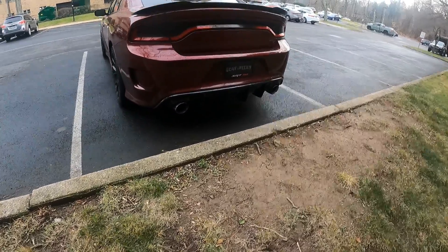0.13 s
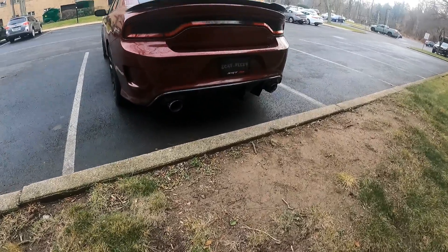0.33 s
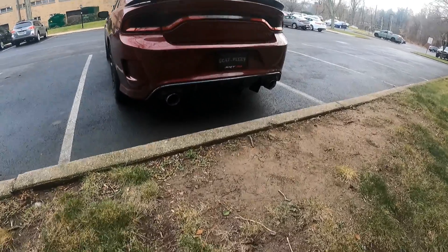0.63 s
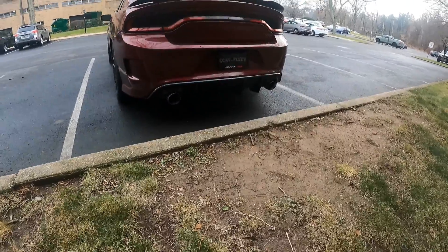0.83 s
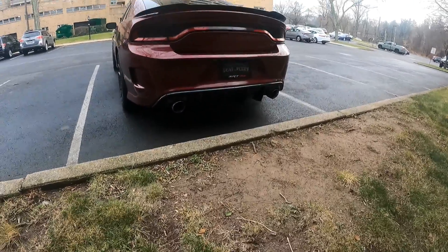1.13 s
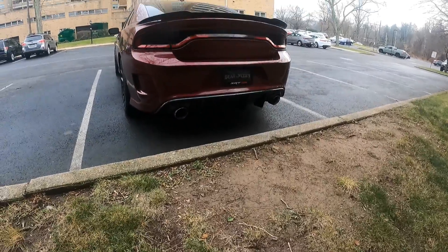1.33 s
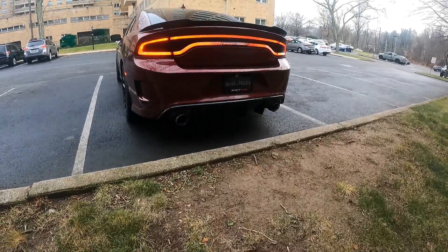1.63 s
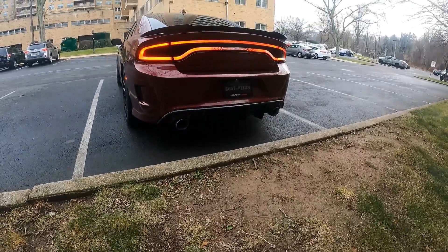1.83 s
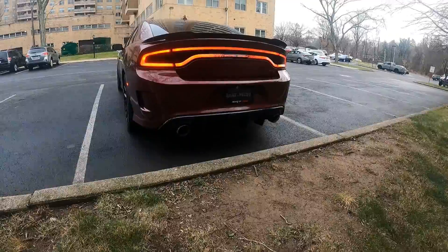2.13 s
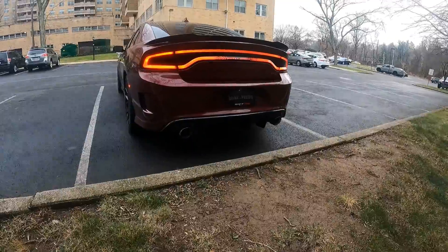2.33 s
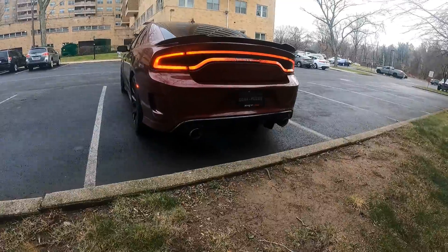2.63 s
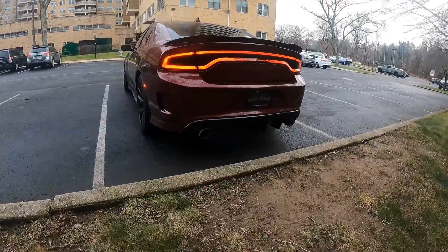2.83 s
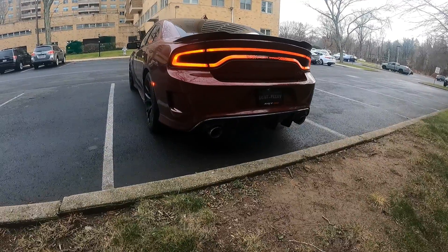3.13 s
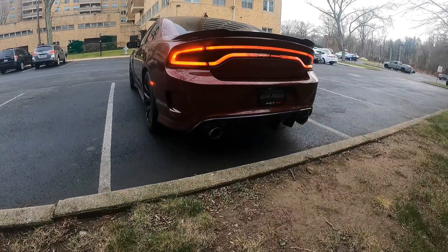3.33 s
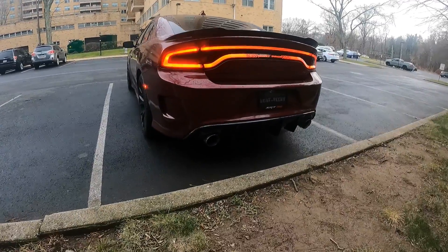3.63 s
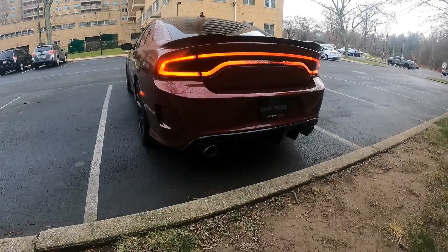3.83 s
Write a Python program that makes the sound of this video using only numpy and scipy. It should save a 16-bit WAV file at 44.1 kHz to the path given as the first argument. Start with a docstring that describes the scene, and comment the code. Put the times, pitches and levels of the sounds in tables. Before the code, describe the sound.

A car engine starts outdoors, heard from close behind. Faint wind, traffic wash and a small tick open. At 0.8 s the starter clanks and grinds, held until 1.2 s, then in short bursts with a sagging whine, soft low puffs and a faint key jingle. At 1.57 s it catches with loud crackling pops, flares near 1.8 s, then sinks into a deep, raspy, throbbing idle until 4 s, with short dry echoes.

```python
"""Faint open air and small ticks come first; then a starter grinds in quick bursts and one long hold, an
eight-cylinder car engine catches with pops, flares and sinks to a throbbing idle, heard from
behind in an open parking lot. Pulse trains excite pipe resonances for the exhaust; noise bursts make
the pops, rattling teeth and a sagging whine the starter, shaped noise the keys, wind and traffic."""
import sys
import numpy as np
from scipy import signal
from scipy.fft import rfft, irfft, next_fast_len
from scipy.io import wavfile
from scipy.ndimage import uniform_filter1d

SR = 44100
rng = np.random.default_rng(int(sys.argv[2]) if len(sys.argv) > 2 else 0)


def output_pcm(signal):
    """Save a mono or channel-first signal as 16-bit PCM at the path in sys.argv[1].

    Samples are clipped to [-1, 1] before scaling.
    """
    pcm = np.clip(np.atleast_2d(signal).T, -1, 1) * 32767
    wavfile.write(sys.argv[1], SR, np.round(pcm).astype(np.int16))


N = 176400  # samples: 4 s


def gain_of(db):
    """Decibel law: an amplitude ratio is ten to the power dB / 20."""
    return 10 ** (np.asarray(db) / 20)


def evened(x):
    """Normalisation: scales a signal to unit rms."""
    return x / np.sqrt(np.mean(x ** 2) + 1e-20)


def curve(table, axis=1):
    """Linear interpolation: one column of a time table at every sample."""
    rows = np.array(table)
    return np.interp(np.arange(N) / SR, rows[:, 0], rows[:, axis])


def read(points, hz):
    """Log-frequency interpolation of a spectrum table."""
    f, value = np.transpose(points)
    return np.interp(np.log(hz + 1), np.log(f + 1), value)


def colour(x, points):
    """Spectral shaping: multiplies the spectrum by a table of gains in dB."""
    gain = gain_of(read(points, np.fft.rfftfreq(len(x), 1 / SR)))
    return irfft(rfft(x) * gain, len(x))


def ring(x, modes):
    """Modal superposition: a sum of damped resonators (pitch_hz, width_hz, strength)."""
    size = next_fast_len(len(x) + SR // 2)
    f = np.fft.rfftfreq(size, 1 / SR)
    response = sum(a * 1j * f * w / (hz ** 2 - f ** 2 + 1j * f * w) for hz, w, a in modes)
    return irfft(rfft(x, size) * response, size)[:len(x)]


def signed(modes):
    """Alternating modal polarity: turns levels in dB into strengths of alternating sign."""
    return [(hz, w, (-1) ** k * gain_of(db)) for k, (hz, w, db) in enumerate(modes)]


def filtered(x, order, hz, kind="low"):
    """Butterworth filtering: passes one side of a corner frequency."""
    return signal.sosfilt(signal.butter(order, hz, kind, fs=SR, output="sos"), x)


def add(mix, s, sound):
    """Superposition: mixes a sound in at s seconds."""
    part = mix[round(s * SR):][:len(sound)]
    part += sound[:len(part)]


# Firing rate of the whole engine: time_s, firings_per_s
FIRING_RATE = [(1.56, 30.2), (1.6, 76.6), (1.64, 86.3), (1.7, 113.5), (1.76, 125.2), (1.82, 136.5),
               (1.9, 127.7), (2.0, 129.2), (2.1, 122.4), (2.3, 111.6), (2.5, 106.9), (2.7, 102.2),
               (2.9, 96.8), (3.1, 94.7), (3.4, 92.8), (4.0, 91.7)]
# Exhaust balance: time_s, boom_db, rasp_db, brightness_db_per_octave
EXHAUST = [(1.56, 4, -16, 3), (1.64, -3.5, -26.5, 0), (1.66, -7, -37.5, -6.5), (1.69, -1, -29, 1),
           (1.77, -4.5, -29, -3.5), (1.83, -13.5, -34, 0.5), (1.86, -7, -28, -2), (2.05, -6, -31.5, -3.5),
           (2.2, -5, -37.5, -5.5), (2.65, -5.5, -39, -3.5), (3.0, -2.5, -32, -2), (3.4, -1.5, -29, -3.5),
           (4.0, -1.5, -28, -3.5)]
# Cylinders in firing order: boom_strength (about the mean), rasp_db (before each resonance's share)
CYLINDERS = [(0.46, -5), (-0.18, -5), (-0.35, -0.5), (-0.45, -1.5), (0.2, 1), (0.43, 4), (-0.031, 1),
             (0.38, 1)]


def engine():
    """Periodic excitation: integrated firing rate times the pulses that drive boom and rasp."""
    t = np.arange(N) / SR
    firings = np.cumsum(curve(FIRING_RATE) * (t >= FIRING_RATE[0][0])) / SR
    at = np.flatnonzero(np.diff(np.floor(firings))) + 1
    order = np.arange(1, len(at) + 1) % len(CYLINDERS)
    uneven, rasp_db = np.array(CYLINDERS)[order].T
    return boom(firings, at, uneven), rasp(firings, at, rasp_db)


# Exhaust pipe modes: pitch_hz, width_hz, signed_strength
PIPE_MODES = [(83.7, 51, -1.9), (111.2, 31.6, -1.3), (161.7, 23.15, 7.5), (174.8, 17.7, -3.5),
              (254, 12.4, 1)]
# Branch pipe modes, rung by uneven firing: pitch_hz, width_hz, strength
BRANCH_MODES = [(124.6, 22.3, 2.71), (166.4, 16.3, 1.83), (193, 24.7, 1.17)]
BOOM_DB, BOOM_LEAD_S, BOOM_TOP_HZ = 30.5, 0.00444, 520
LOOSE, SETTLE_S = 0.28, 0.87  # relative scatter of the first firings and how fast it settles
# Smooth surge at the firing rate: share taken from the pulses, fading time, level, phase in cycles
SURGE, SURGE_S, SURGE_DB, SURGE_TURN = 0.6, 0.57, -4, 0.84


def boom(firings, at, uneven):
    """Pipe resonance: pressure pulses ring the pipe, and cylinder differences ring the branches."""
    since_start = np.arange(N) / SR - FIRING_RATE[0][0]
    surge = SURGE * np.exp(-(since_start / SURGE_S) ** 2) * np.minimum(firings * 2, 1)
    loose = LOOSE * np.exp(-since_start[at] / SETTLE_S) + 0.08
    scatter = 1 + loose * rng.standard_normal(len(at))
    pulse_gain = gain_of(BOOM_DB + curve(EXHAUST)[at])
    even_pulses, odd_pulses = np.zeros((2, N))
    pulse_at = at - round(BOOM_LEAD_S * SR)
    even_pulses[pulse_at] = pulse_gain * scatter * (1 - surge[at])
    odd_pulses[pulse_at] = pulse_gain * uneven
    rung = ring(even_pulses, PIPE_MODES) + ring(ring(odd_pulses, BRANCH_MODES), BRANCH_MODES)
    low_pass = signal.butter(2, BOOM_TOP_HZ, fs=SR, output="sos")
    swell = surge * gain_of(SURGE_DB + curve(EXHAUST)) * np.cos(2 * np.pi * (firings + SURGE_TURN))
    return signal.sosfiltfilt(low_pass, rung) + swell


# Tailpipe resonances: pitch_hz, width_hz, level_db, cylinder_share (of the cylinder rasp pattern)
TAILPIPE = [(452, 145, -4, 0.34), (625.5, 58, 2.5, 0.18), (927, 41.3, 1, 0.9), (1160, 202, -4.5, 0.82),
            (1627, 490, -7, 0.33), (2430, 430, -7.5, 0.16), (2684, 330, -6.5, 0.28), (3180, 940, -27, 0.13)]
# Hiss spectrum before levelling: pitch_hz, level_db
HISS_SPECTRUM = [(2500, -16), (7500, -17), (10000, -55.5)]
RASP_LAG_S, RASP_DECAY_S = 0.00018, 0.0027
RASP_CLEAN, RASP_BED = 0.47, 0.18  # share of bare clicks; steady noise under the puffs
RASP_SPREAD_DB, HISS_DB = 2.5, -23
DRIVE_TOP_HZ = 3530  # upper limit of the clicks and puffs that drive the rasp


def rasp(firings, at, rasp_db):
    """Source and filter: each firing's click and noise puff excite the tailpipe resonances."""
    clicks = np.zeros(N + SR)
    lag_s = RASP_LAG_S + 0.0002 * rng.standard_normal(len(at))
    clicks[at + np.round(lag_s * SR).astype(int)] = 1
    clicks = clicks[:N]
    gate = signal.lfilter([1], [1, -np.exp(-1 / (RASP_DECAY_S * SR))], clicks)
    puffs = evened((RASP_BED + uniform_filter1d(gate, 70)) * rng.standard_normal(N))
    drive = RASP_CLEAN * evened(clicks) + (1 - RASP_CLEAN) * puffs
    drive = filtered(drive, 6, DRIVE_TOP_HZ)

    # Each firing has its own level in each resonance
    firing = np.clip(firings + 0.2, 1, len(at)).astype(int) - 1
    spread_db = RASP_SPREAD_DB * rng.standard_normal((len(at), len(TAILPIPE)))
    shade_db = np.outer(rasp_db, np.array(TAILPIPE)[:, 3]) + spread_db
    modes = signed(np.array(TAILPIPE)[:, :3])
    parts = [ring(drive * gain_of(db[firing]), [mode]) for db, mode in zip(shade_db.T, modes)]
    scale = np.sqrt(np.mean(sum(parts) ** 2))

    # Brightness tilts the resonances about 800 Hz
    bright = curve(EXHAUST, axis=3)
    tilted = sum(p * gain_of(bright * np.log2(mode[0] / 800)) for p, mode in zip(parts, TAILPIPE))
    hiss = gain_of(HISS_DB + bright) * evened(colour(puffs + rng.standard_normal(N), HISS_SPECTRUM))
    running = np.arange(N) / SR > FIRING_RATE[0][0]
    return (tilted / scale + hiss) * gain_of(curve(EXHAUST, axis=2)) * running


# Pops: start_s, peak_db, ring_hz
POPS = [(1.57, -4.5, 2650), (1.5838, -8, 1500), (1.599, -8, 1550), (1.625, -2, 2830), (1.636, -3, 2740),
        (1.668, -11.5, 2900), (1.7047, -23.5, 1430), (1.7135, -10, 2850), (1.729, -7, 2660),
        (1.7379, -9.5, 2600), (1.7693, -5.5, 1300), (1.777, -7.5, 2770)]
# Pop spectrum before levelling: pitch_hz, level_db
POP_SPECTRUM = [(300, -44), (600, -7.5), (2800, -3), (5000, -15), (12000, -43)]
POP_DECAY_S, POP_RING, POP_WIDTH_HZ = 0.0015, 0.32, 170  # POP_RING is the share of ringing
# The first pops are longer and dull
MUFFLED_UNTIL_S, MUFFLED_DECAY_S, MUFFLED_TOP_HZ = 1.62, 0.003, 3300


def pops():
    """Impulsive radiation: decaying noise bursts ring at the tailpipe as the engine catches."""
    out, t = np.zeros(N), np.arange(2048) / SR
    window = np.minimum(t * SR / 10, 1) * np.cos(np.pi / 2 * t / t[-1]) ** 2
    for s, db, hz in POPS:
        muffled = s < MUFFLED_UNTIL_S
        decay_s = MUFFLED_DECAY_S if muffled else POP_DECAY_S
        burst = rng.standard_normal(len(t)) * np.exp(-t / decay_s)
        crack = evened(colour(burst, POP_SPECTRUM))
        ringing = evened(ring(burst, [(hz, POP_WIDTH_HZ, 1)]))
        pop = (1 - POP_RING) * crack + POP_RING * ringing
        if muffled:
            pop = filtered(pop, 6, MUFFLED_TOP_HZ)
        pop = pop * window
        add(out, s, gain_of(db) * pop / abs(pop).max())
    return out


# Starter grinds, four quick bursts and one long hold: start_s, grind_db, fall_db_per_s (negative swells)
GRINDS = [(0.797, -18.5, 313), (0.827, -35.5, -6.5), (1.196, -29, 94.5), (1.351, -27, 142),
          (1.479, -25, 139)]
# Housing resonances, relative levels: pitch_hz, width_hz, level_db
HOUSING = [(572.4, 41, -2.5), (915, 19.4, 10), (2170, 270, -7)]
# Broad grind spectrum before levelling: pitch_hz, level_db
GRIND_SPECTRUM = [(200, -24.5), (500, -14), (1100, -9), (4500, -19), (7000, -55.5)]
# Treble spectrum before levelling: pitch_hz, level_db
TREBLE_SPECTRUM = [(2500, -29), (3500, 3), (7600, 7.5), (9000, -15), (14000, -34)]
GRIND_RISE_S, HOLD_END_S = 0.0051, 1.176
HOUSING_DB, TEETH_PER_S, TOOTH_DB = 1, 1100, 1
TREBLE_DB, TREBLE_SLOPE = -11.5, 1.42  # a slope above 1 brightens the loud moments


def starter_grind():
    """Structure-borne noise: gear teeth rattle the housing, brighter where the grind is louder."""
    t = np.arange(N) / SR
    load = np.zeros(N)
    for s, db, fall in GRINDS:
        level_db = db - fall * abs(t - s)
        if s < HOLD_END_S:
            level_db = level_db - 150 * np.maximum(t - HOLD_END_S, 0)
        load += np.clip((t - s) / GRIND_RISE_S, 0, 1) * gain_of(level_db)
    hits = rng.random(N) < TEETH_PER_S / SR
    hit_gain = gain_of(TOOTH_DB * np.minimum(rng.exponential(1, N), 2))
    teeth = evened(rng.standard_normal(N) * (0.77 + hit_gain * hits))
    housing = gain_of(HOUSING_DB) * evened(ring(teeth, signed(HOUSING)))
    grind = evened(evened(colour(teeth, GRIND_SPECTRUM)) + housing)
    treble = evened(colour(teeth, TREBLE_SPECTRUM)) * gain_of(TREBLE_DB)
    return load * (grind + treble * (load / gain_of(-21.5)) ** (TREBLE_SLOPE - 1))


# Motor whine, sagging on compressions: time_s, pitch_hz, level_db
WHINE = [(.9, 964, -52), (.99, 878, -32.5), (1.07, 562, -42.5), (1.2, 902, -84), (1.25, 733, -30.5),
         (1.33, 543, -56)]


def starter_whine():
    """Frequency modulation: two harmonics follow the motor's sagging, jittering pitch."""
    t = np.arange(N) / SR
    jitter_hz = 400 * uniform_filter1d(rng.standard_normal(N), 300)
    phase = 2 * np.pi * np.cumsum(curve(WHINE) + jitter_hz) / SR
    sounding = (t > WHINE[0][0]) * (t < WHINE[-1][0])
    return sounding * gain_of(curve(WHINE, axis=2)) * (np.sin(phase) + 0.85 * np.sin(2 * phase))


# Unfired exhaust puffs: start_s, level_db, pitch_hz
PUFFS = [(0.835, -17, 101), (.965, -23, 46.2), (1.175, -18, 66), (1.4, -24, 49), (1.502, -19.5, 60.6)]
PUFF_CYCLES = 3.45  # cycles in each puff


def starter_puffs():
    """Low-frequency pulsation: unfired air leaves as short windowed sine bursts."""
    low = np.zeros(N)
    for s, db, hz in PUFFS:
        u = np.arange(0, 1, hz / (PUFF_CYCLES * SR))  # fraction of the puff elapsed
        window = np.sin(np.pi * u ** 0.78) ** 2
        add(low, s, -gain_of(db) * window * np.sin(2 * np.pi * PUFF_CYCLES * u))
    return low


# Key jingles: start_s, level_db, length_s
JINGLES = [(0.414, -49, 0.031), (1.032, -31.5, 0.017), (1.495, -36.5, 0.014), (2.878, -48, 0.0091)]
# Key resonances, relative levels: pitch_hz, width_hz, level_db
KEYS = [(3700, 300, 9), (7200, 330, 0.5), (8970, 300, -2), (11860, 670, -1.5)]


def jingles():
    """Modal ringing: irregular shaking noise excites the narrow resonances of keys."""
    out = np.zeros(N)
    for s, db, length in JINGLES:
        u = np.arange(0, 3, 1 / (length * SR))
        roughness_db = 30 * uniform_filter1d(rng.standard_normal(len(u)), 60)
        shake = rng.standard_normal(len(u)) * gain_of(roughness_db)
        envelope = np.minimum(u * 5, 1) * np.exp(-u ** 2 * 0.5)
        add(out, s, gain_of(db) * evened(ring(shake, signed(KEYS))) * envelope)
    return out


# Ticks: start_s, peak_db
TICKS = [(0.3, -24), (1.009, -20), (2.823, -29.5), (2.873, -30.5)]
# Small-part resonances: pitch_hz, width_hz, strength
TICK_MODES = [(3180, 1100, 1.14), (5000, 670, 0.79)]
TICK_DECAY_S = 0.0017


def ticks():
    """Impact response: a tiny noise burst passes twice through the modes of small parts."""
    out, t = np.zeros(N), np.arange(600) / SR
    for s, db in TICKS:
        burst = rng.standard_normal(len(t)) * np.exp(-t / TICK_DECAY_S)
        tick = ring(ring(burst, TICK_MODES), TICK_MODES)
        add(out, s, gain_of(db) * tick / abs(tick).max())
    return out


def background_drop():
    """Level change: a ramp from 0 to 1, starting at 1.7 s, for the background to fall by."""
    return np.clip((np.arange(N) / SR - 1.7) * 1.5, 0, 1)


# Traffic wash spectrum before levelling: pitch_hz, level_db
AIR_SPECTRUM = [(100, -55.5), (200, -11.5), (1600, -16), (3000, -26), (8000, -42), (15000, -55)]
# Wash treble, used relative to the last row: time_s, level_db
AIR_TREBLE = [(0, -41.5), (.29, -38.5), (.36, -47)]
AIR_DB, AIR_DROP_DB = -43.5, -2.5


def traffic_wash():
    """Diffuse field: two independent shaped noises mix into a wide distant traffic wash."""
    lift_db = curve(AIR_TREBLE) - AIR_TREBLE[-1][1]
    air = np.array([colour(v, AIR_SPECTRUM) for v in rng.standard_normal((2, N))])
    top = filtered(air, 2, 2500, "high")
    air = (air + top * (gain_of(lift_db) - 1)) / np.std(air) * gain_of(AIR_DB)
    stereo = np.array([air[0] + 0.68 * air[1], air[0] - 0.37 * air[1]])
    return stereo * gain_of(AIR_DROP_DB * background_drop())


# Wind spectrum before levelling: pitch_hz, level_db
WIND_SPECTRUM = [(15, -15), (40, -4), (130, -13.5), (300, -25.5)]
WIND_DB, WIND_LUMP_DB, WIND_DROP_DB = -31.5, 3.5, -4


def wind_rumble():
    """Turbulence noise: low shaped noise swells and sinks with a slow random level."""
    lumps = evened(uniform_filter1d(uniform_filter1d(rng.standard_normal(N), 2500), 2500))
    rumble = evened(colour(rng.standard_normal(N), WIND_SPECTRUM + [(600, -78.5)]))
    return gain_of(WIND_DB + WIND_LUMP_DB * lumps) * rumble * gain_of(WIND_DROP_DB * background_drop())


LOT_T60_S = 0.15


def lot(x):
    """Sparse reverberation: two unlike tails of echoes off asphalt, cars and a far wall."""
    t = np.arange(SR // 2) / SR
    present = (rng.random((2, len(t))) < 0.05) * (t > 0.003)
    taps = rng.standard_normal((2, len(t))) * present * gain_of(-60 * t / LOT_T60_S)
    return signal.fftconvolve(x[None], taps / np.linalg.norm(taps[0]), axes=1)[:, :N]


# Spectrum of the echoes that form the side signal: pitch_hz, gain_db
SIDES = [(300, -28), (2400, -8), (12000, -8.5)]
# Stereo lean of the car: pitch_hz, left_minus_right_db
LEAN = [(400, -3), (2500, -1), (12000, 0.5)]
LOT_DB = -10.5  # echoes in the middle


def scene():
    """Mid-side stereo: car ahead, small things a little left, bass near the middle."""
    boom_sound, rasp_sound = engine()
    mid = rasp_sound + pops() + starter_grind() + starter_whine()
    wet = lot(mid)
    mid = mid + gain_of(LOT_DB) * wet[0]
    side = colour(wet[1], SIDES)
    left = colour(mid + side, [(hz, db / 2) for hz, db in LEAN])
    right = colour(mid - side, [(hz, -db / 2) for hz, db in LEAN])
    bass = (boom_sound + starter_puffs() + wind_rumble()) * gain_of([[0.2], [-0.2]])
    small_things = (jingles() + ticks()) * gain_of([[2.5], [-2.5]])
    return np.array([left, right]) + bass + small_things + traffic_wash()


LOW_CUT_HZ, EDGE_HZ = 36, 15300


def record(dry):
    """Band limiting and saturation: low cut, soft ceiling, then a steep upper edge."""
    x = filtered(dry, 2, LOW_CUT_HZ, "high")
    x = x / (1 + abs(x) ** 6) ** (1 / 6)
    edge = signal.firwin(511, EDGE_HZ, window=("kaiser", 9), fs=SR)
    return signal.oaconvolve(x, edge[None], "same")


dry = scene()
out = record(dry)
output_pcm(out)
```